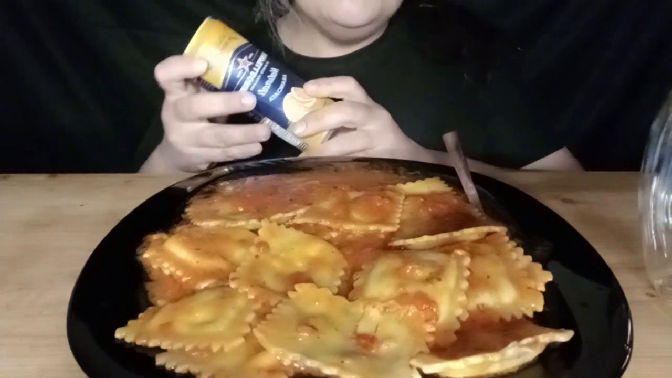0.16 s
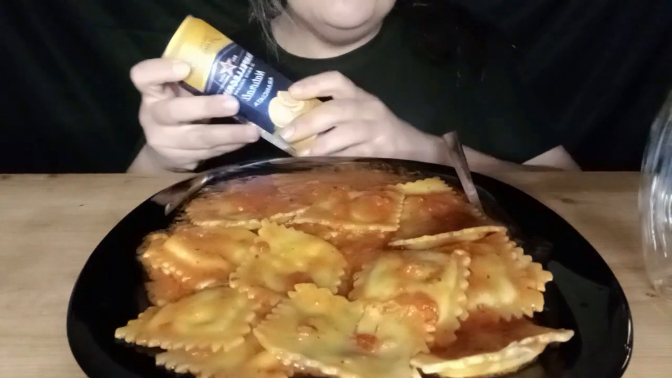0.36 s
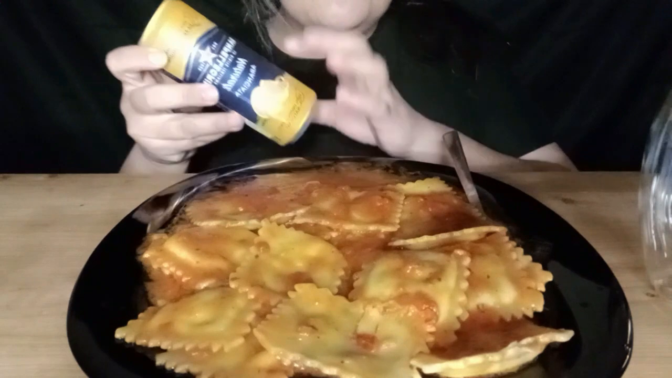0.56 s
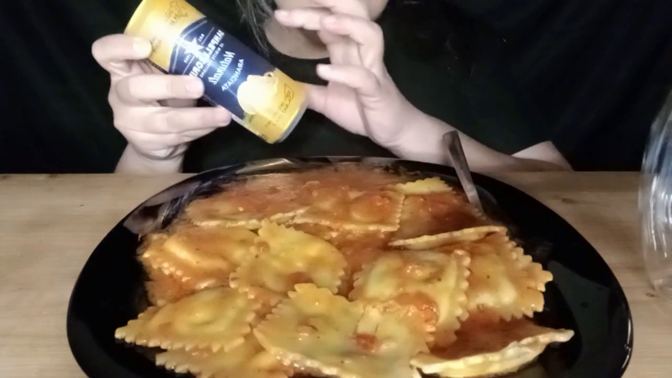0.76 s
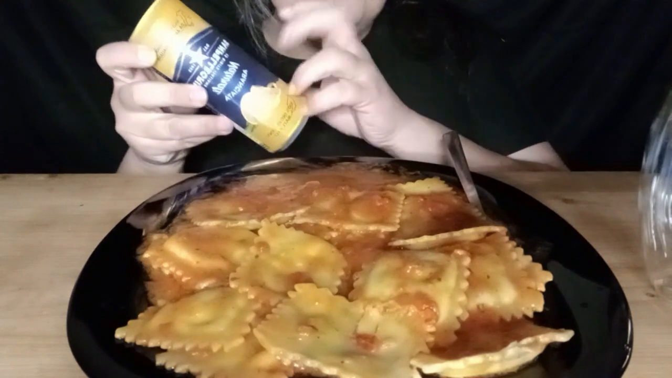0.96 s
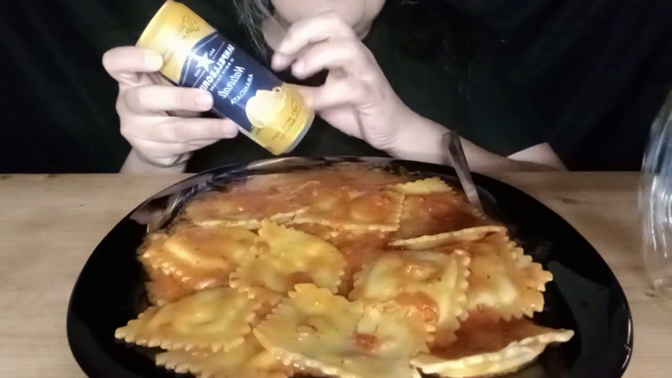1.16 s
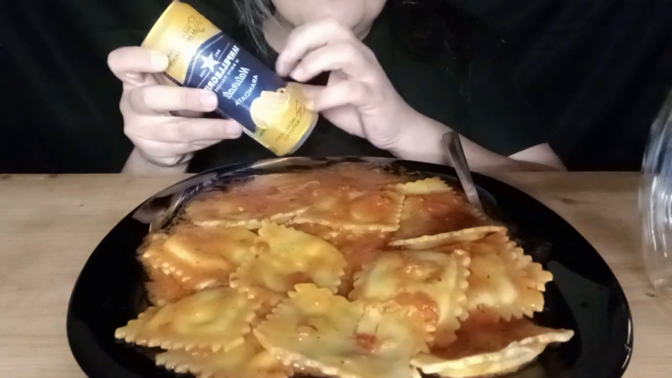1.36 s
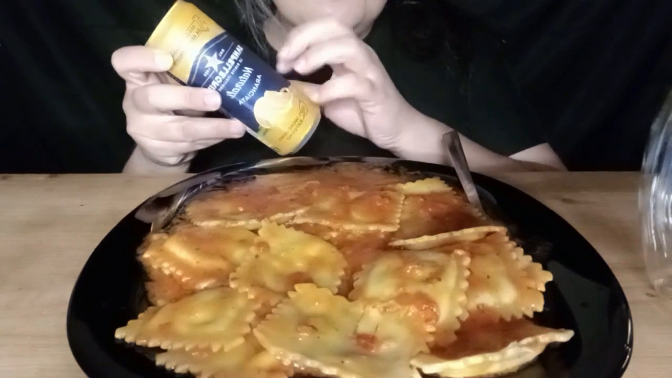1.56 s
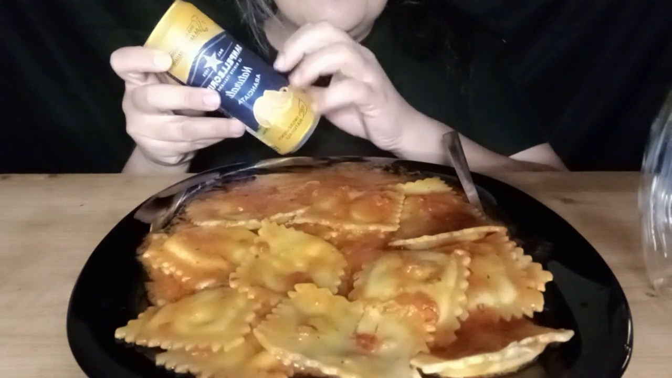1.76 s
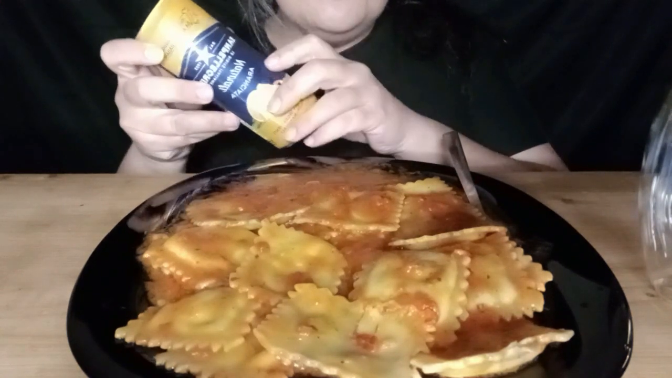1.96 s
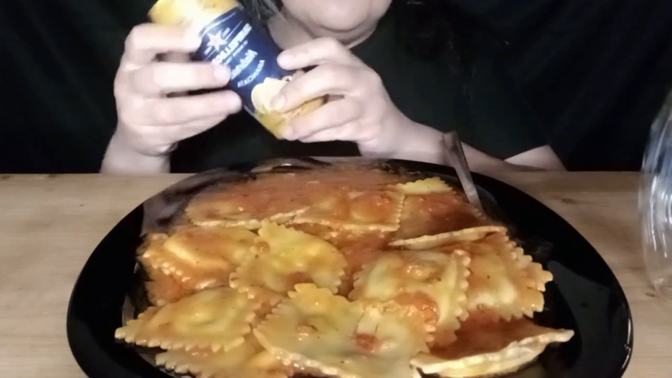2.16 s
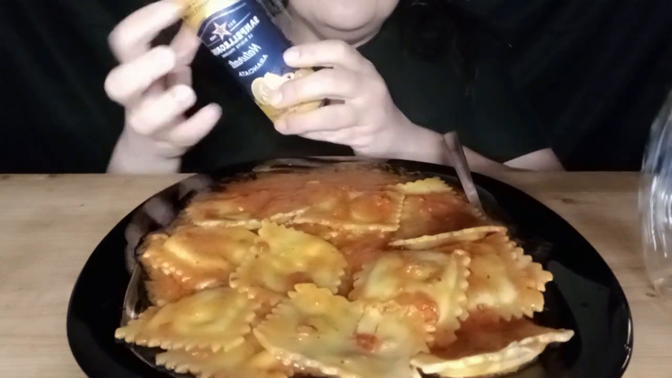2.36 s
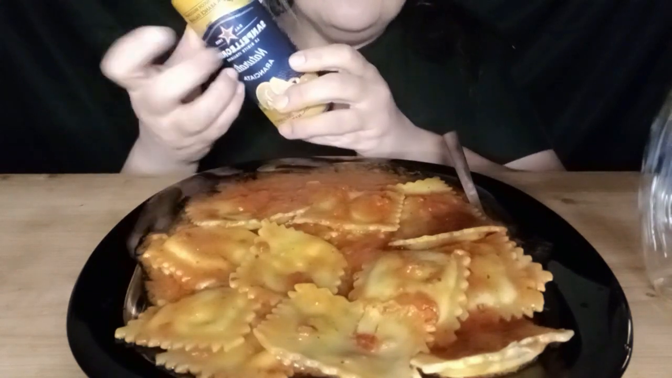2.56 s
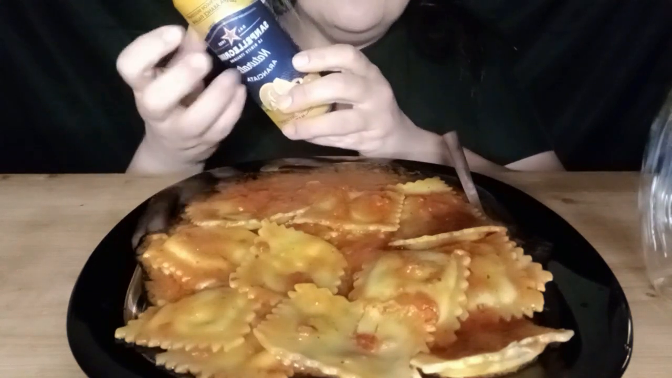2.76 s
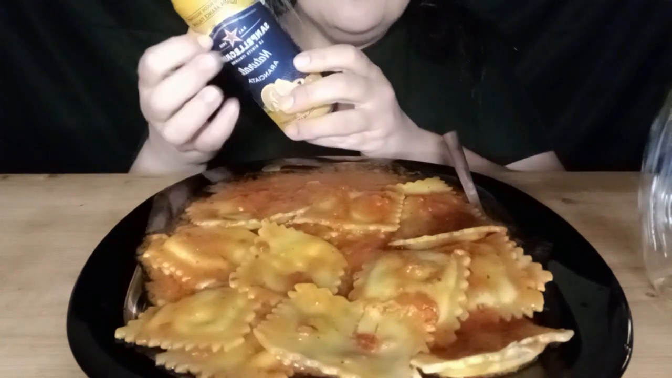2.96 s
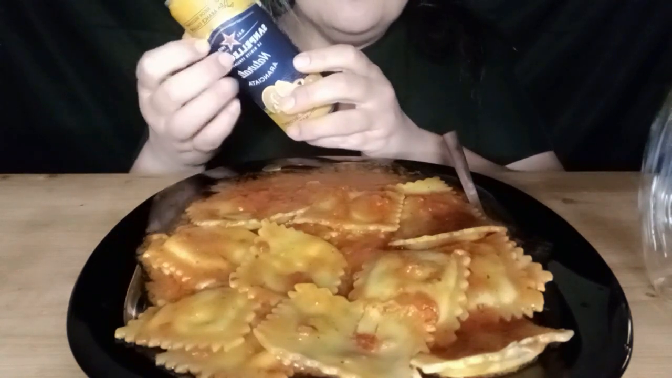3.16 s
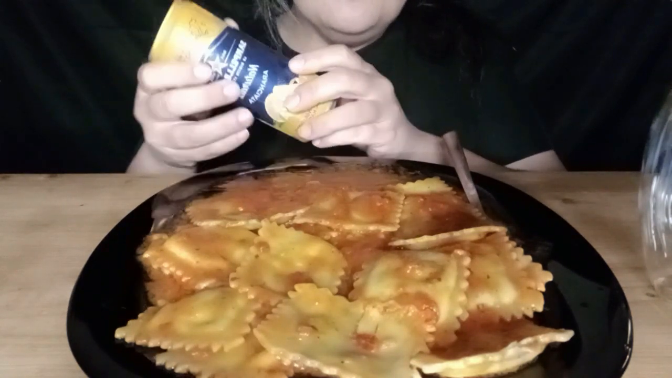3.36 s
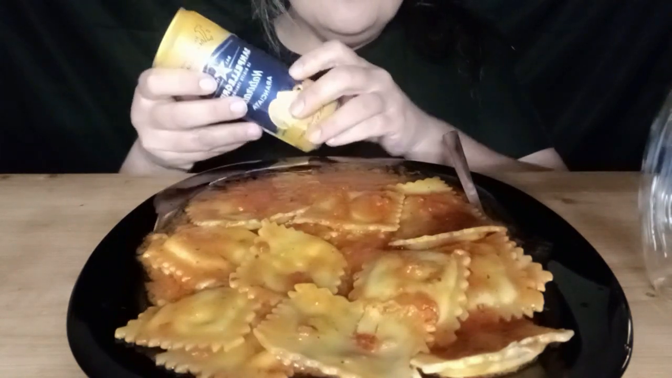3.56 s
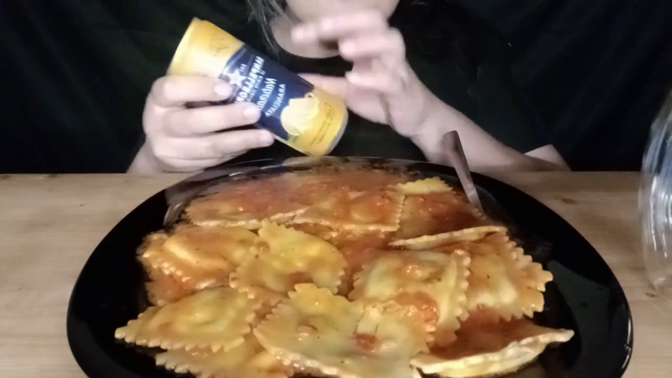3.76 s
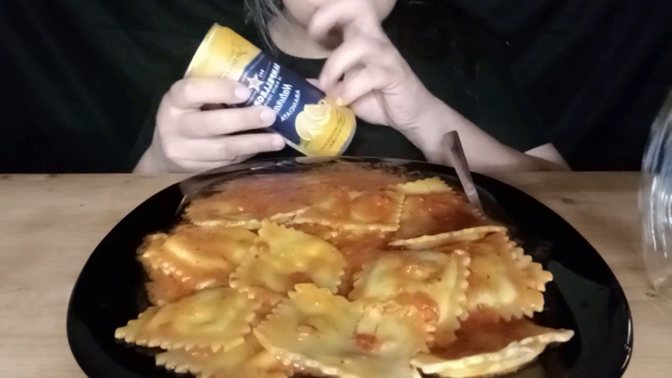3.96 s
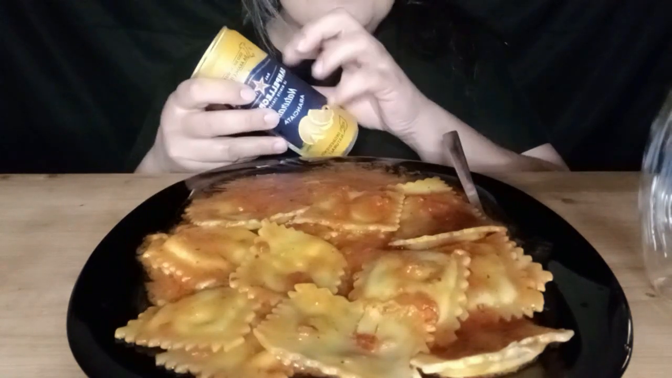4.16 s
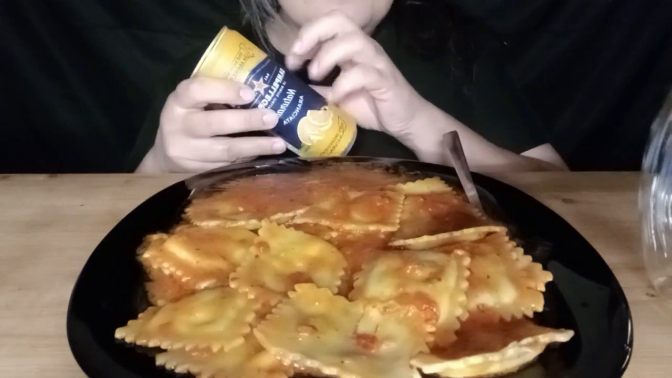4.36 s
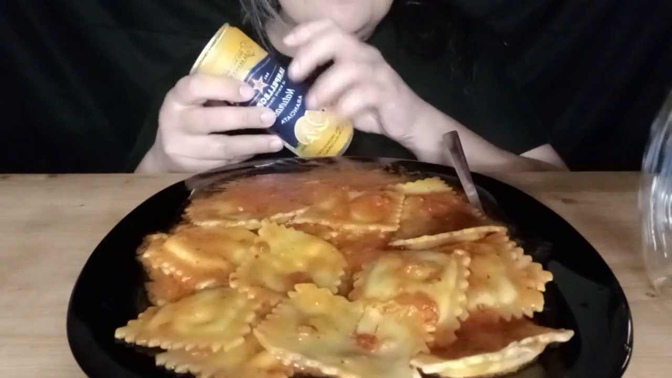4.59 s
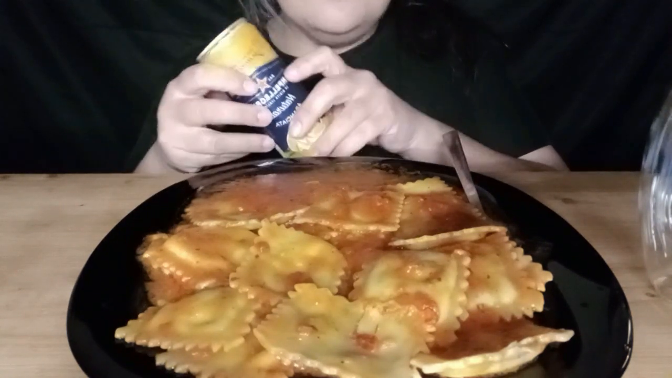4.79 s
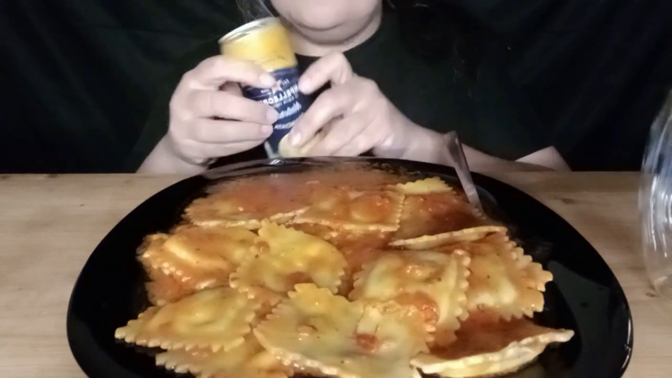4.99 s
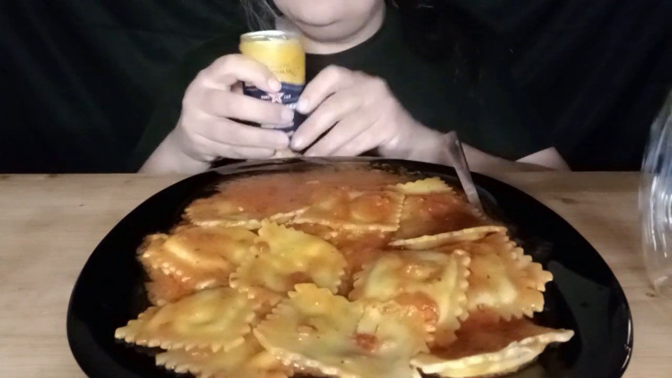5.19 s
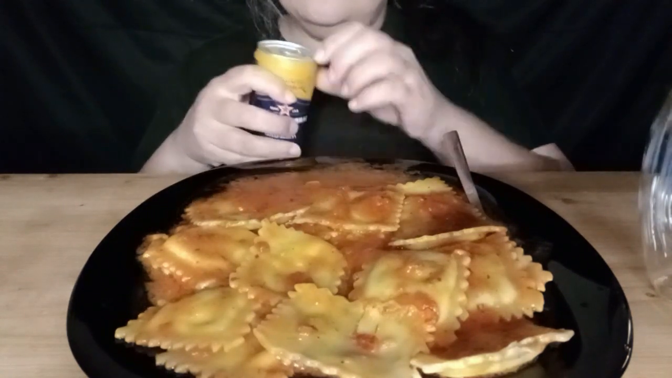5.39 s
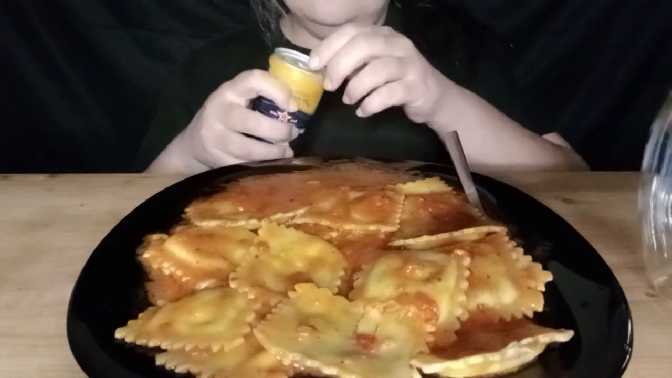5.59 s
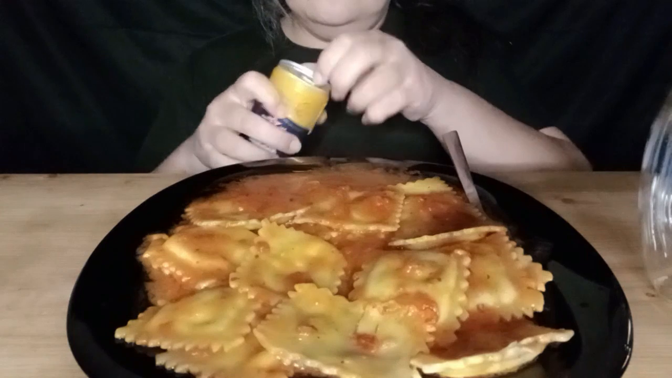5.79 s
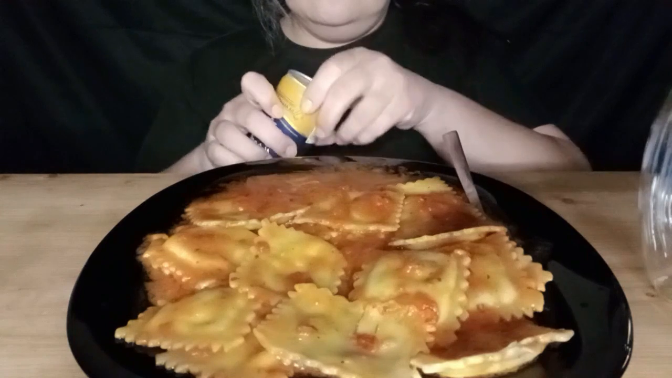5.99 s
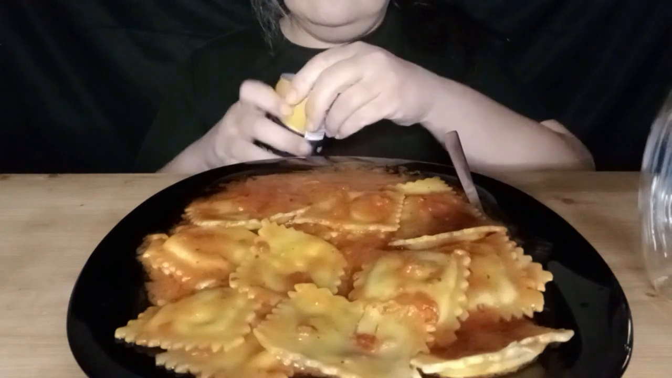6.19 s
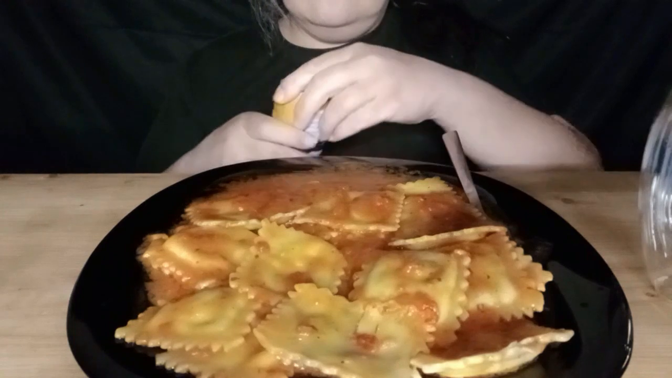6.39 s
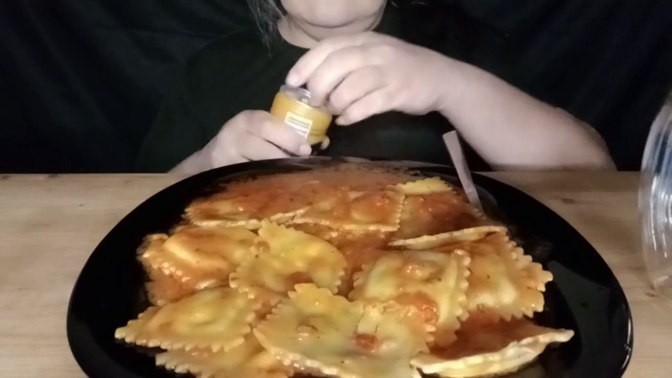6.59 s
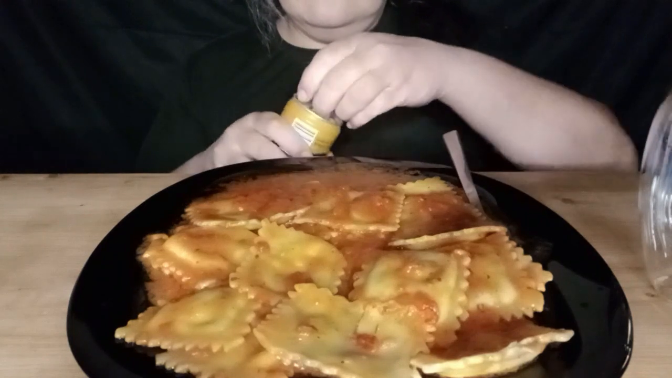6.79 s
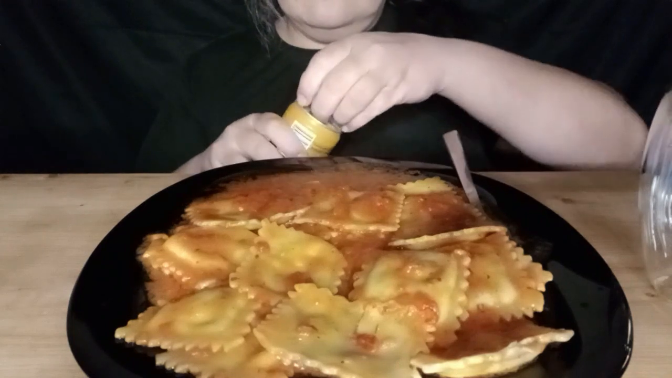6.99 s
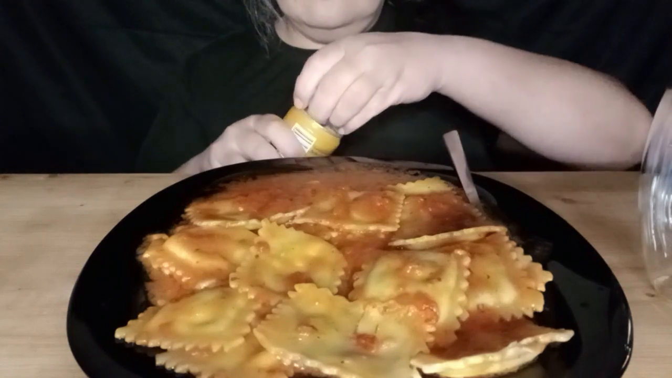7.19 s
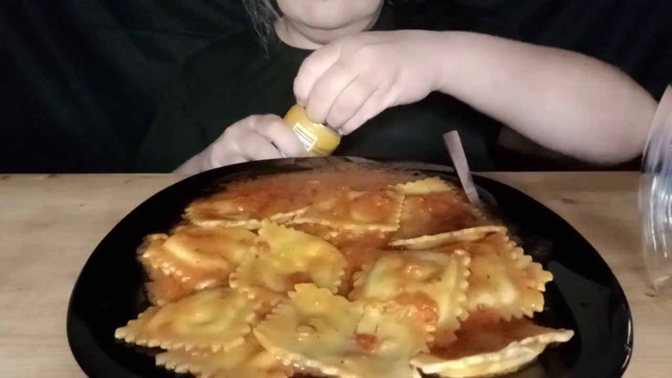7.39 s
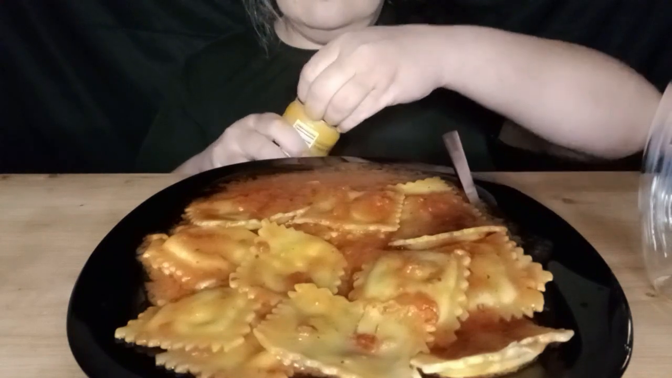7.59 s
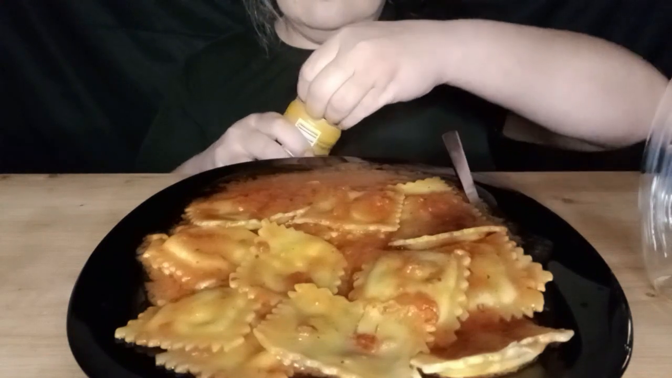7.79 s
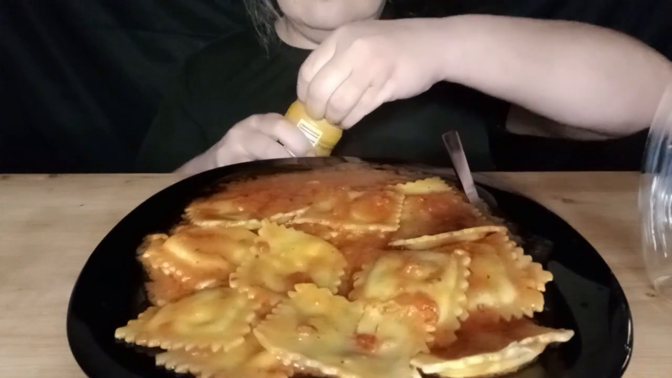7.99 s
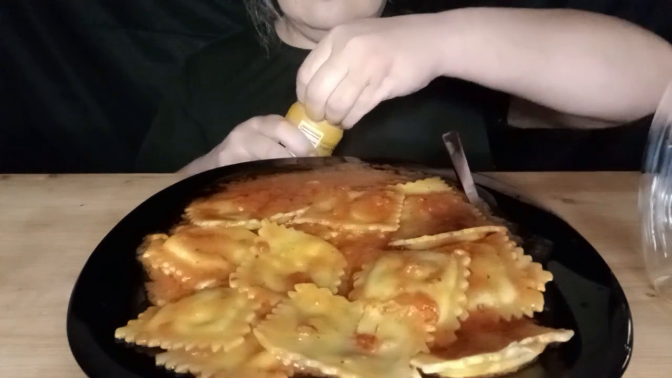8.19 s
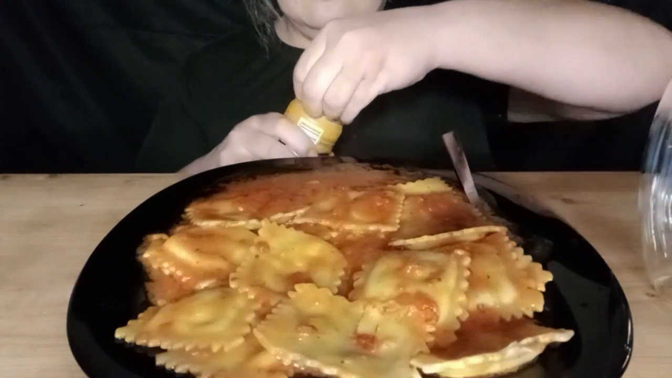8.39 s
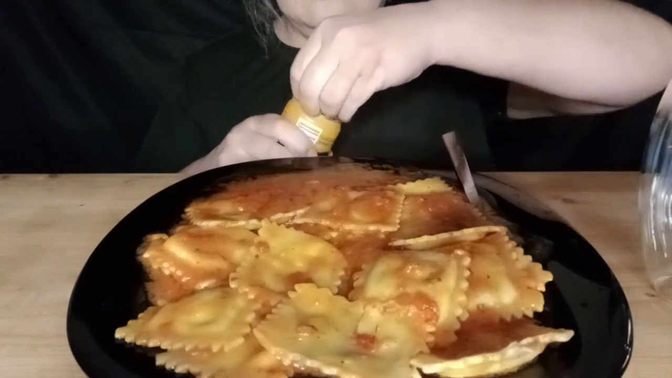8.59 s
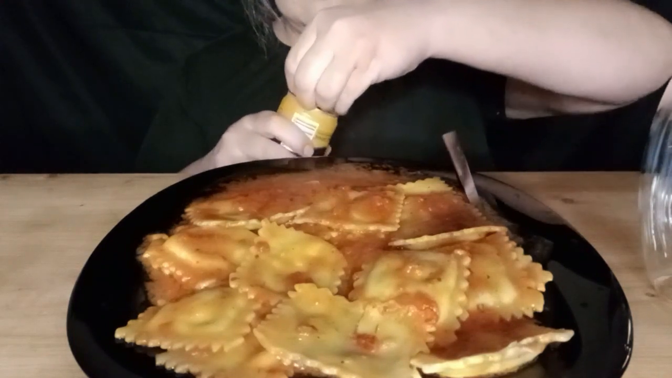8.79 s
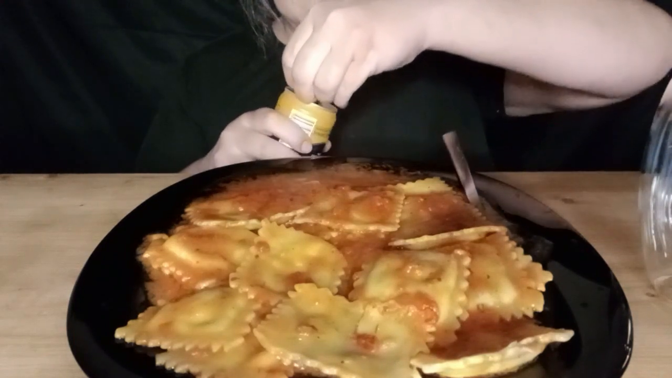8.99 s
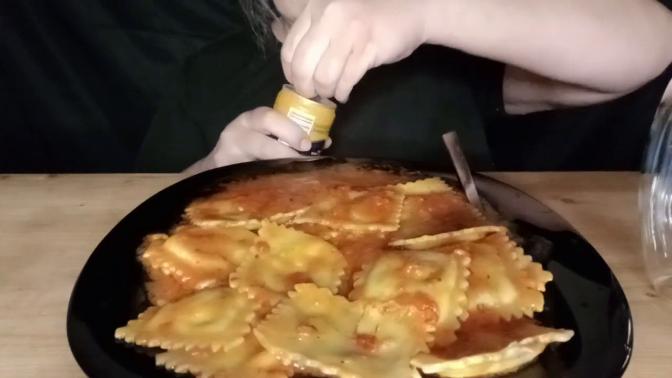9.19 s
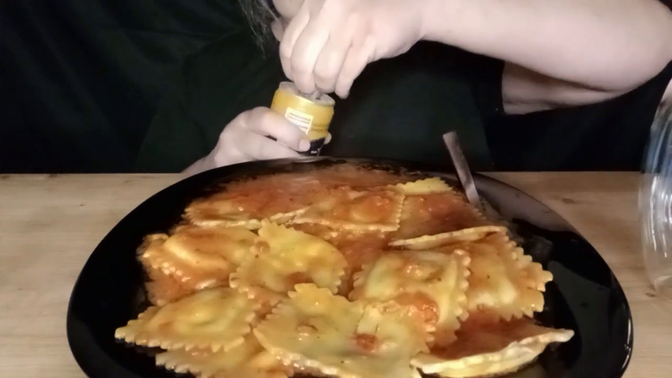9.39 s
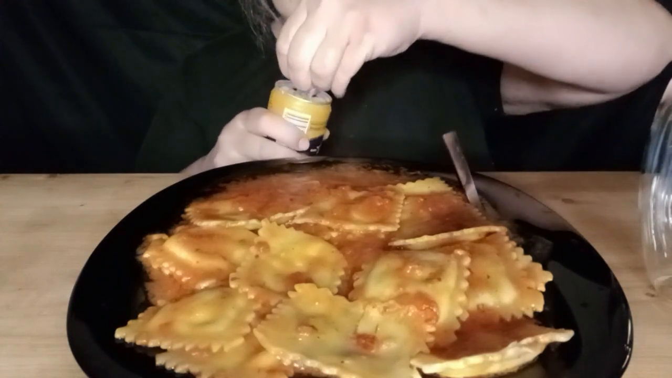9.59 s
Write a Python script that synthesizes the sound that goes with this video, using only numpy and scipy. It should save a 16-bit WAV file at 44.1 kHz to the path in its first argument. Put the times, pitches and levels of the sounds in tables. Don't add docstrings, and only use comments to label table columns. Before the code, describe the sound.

A quiet room with soft hiss, faint low hum and distant machinery rumble, miked very closely in stereo. A soft knock at 0.1 s. From 1.0 to 1.75 s fingernails drum on a full aluminium can: crisp, dense ticks with short dull-metal rings. A faint skin slip near 2.1. A second, slightly higher roll runs 2.6-3.2, then a short rub and soft knock around 3.4-3.5. A third roll runs 4.0-4.6. Small arm jolts at 5.6-5.7; knocks and skin slides at 6.1-6.6. Tiny nail picks at the tab, 6.8-7.9. At 8.24 the seal cracks sharply; gas leaks, swelling to a bright, shrill jet by 8.4, ended by a big pop at 8.52. Hollow froth murmurs on. A low thump and weak puffs at 8.8-9.2, double snap at 9.2, then two very loud snaps at 9.42-9.44 with a thud, decaying into fizzy quiet.

```python
import sys
import numpy as np
from scipy import signal
from scipy.fft import rfft, irfft
from scipy.io import wavfile
from scipy.ndimage import uniform_filter1d

SR = 44100
rng = np.random.default_rng(int(sys.argv[2]) if len(sys.argv) > 2 else 0)


def master(y):
    cut = np.clip(np.atleast_2d(y).T, -1, 1)
    pcm = np.round(cut * 32767)
    wavfile.write(sys.argv[1], SR, pcm.astype(np.int16))


def voltage_ratio(decibels):
    exponent = np.asarray(decibels, float) / 20
    return 10 ** exponent


N = 425565

# [f/Hz, level/dB]
HISS_SPECTRUM = [(74, -41.5), (125, -6), (235, -2), (367, -15.5), (497, -10), (634, -14), (1370, -17),
                 (1980, -18.5), (2570, -21), (7550, -27.5), (16000, -28.5)]
HISS_DB = -61.5
# [f/Hz, correlation/1]
HISS_LIKENESS = [(60, 0.12), (240, 0.15), (950, 0.3), (3770, 0.066), (15000, 0.046)]
# [f/Hz, level/dB, wavering/dB]
HUM = (100.3, -63, 0.72)
RUMBLE_DB = -62
RUMBLE_SWELLS = [
    (.12, -59.5, .15, 12),
    (4.2, -58, 0.53, 14),
    (7.5, -56, 0.91, 12),
]
DRONE_DB = -73
DRONE_SWELLS = [
    (.11, -62.5, 0.12, 23),
    (.95, -64.5, .5, 22),
    (1.95, -66.5, 1, 11),
    (2.35, -65, 0.19, 8.7),
    (4.3, -64, 0.27, 50),
]
# [t/s, length/s, f/Hz, level/dB]
MOAN = (1.99, .18, 500, -59)
# [f/Hz, t60/s]
ROOM_T60 = [(300, 1), (1000, 0.96), (2000, 0.86), (4000, .7), (8000, 0.48), (16000, 0.4)]
# [delay/s, left level/dB, right level/dB]
ECHO = (.0061, -4, -7)
ECHO_DULL = 0.08
# [f/Hz, level/dB]
HAND_SHIELD = [(500, 0), (2600, 2), (3300, -1), (3700, 3), (4200, -5.5), (5000, 2.5), (8000, 3),
               (11500, -0.5), (15000, 0)]

# [t/s, peak level/dB, f/Hz, t60/s]
THUDS = [
    (8.835, -35, 100.6, 0.52),
    (8.939, -40.5, 134.3, 0.22),
    (9.435, -49, 24, .2),
    (9.436, -31, 244, 0.12),
]
# [peak t/s, level/dB, rise/s, fade/(dB/s)]
JOLTS = [
    (5.3, -62.5, .2, 12),
    (5.594, -49, 0.049, 150),
    (5.724, -49, 0.031, 240),
    (8.68, -48, 0.055, 21),
    (8.842, -42.5, .012, 67),
    (8.955, -47, .03, 250),
    (9.012, -50, .015, 170),
    (9.45, -48, 0.011, 503),
    (9.494, -67, .02, 178),
]
# [f/Hz, level/dB]
JOLT_SPECTRUM = [(30, -60), (65, -11), (95, 0), (140, 3), (200, -4.5), (270, -10), (500, -27.5),
                 (1200, -120)]
# [peak t/s, level/dB, rise/s, fade/(dB/s)]
SLIDES = [
    (1.972, -72, .004, 393),
    (2.066, -70, .012, 248),
    (2.128, -64.5, .03, 160),
    (3.37, -64.5, .03, 424),
    (6.114, -54.5, 0.013, 82),
    (6.32, -62, .016, 800),
    (6.384, -58, .018, 90),
    (6.522, -56, 0.055, 130),
]
# [f/Hz, level/dB]
SKIN_SPECTRUM = [(1180, -4), (2000, -4), (2280, -3.5), (4570, -7), (7840, 2.5), (11200, -9), (15200, -8.5),
                 (16000, -10.5)]
# [t/s, f/Hz, width/Hz, level/dB, t60/s]
HOLLOW = [(8.525, 2070, 430, -29, 0.95), (8.525, 1470, 570, -35, 0.92), (8.522, 315, 185, -47, 1.97),
          (8.525, 4330, 450, -28.5, 0.7), (9.214, 4260, 900, -37, 0.37), (9.215, 6100, 1400, -35.5, 0.46),
          (9.445, 3700, 350, -27, 1.13), (9.44, 610, 250, -43.5, 0.63), (9.447, 1650, 960, -31.5, 0.56),
          (9.445, 280, 540, -39, 0.73), (8.24, 1900, 130, -48, 0.36), (8.24, 2760, 500, -49, 0.24),
          (9.212, 1940, 890, -43.5, 0.32), (9.212, 540, 230, -52, 0.38), (8.98, 834, 71, -56.5, 0.65),
          (8.525, 3500, 1300, -33, 0.79), (9.9, 1800, 140, -52, 1.1), (9.446, 4400, 2000, -28.5, 0.84),
          (10, 13000, 2200, -31.5, 0.46), (9.215, 4130, 450, -44, 0.34), (9.446, 12000, 5400, -39, 0.67),
          (8.238, 1180, 58, -39, 0.1), (8.525, 6100, 1900, -37.5, 0.95)]
SAG_PER_S, FLUTTER_DB = 0.032, 1.5

# [t/s, peak level/dB, f/Hz, t60/s, bright body level/dB]
KNOCKS = [
    (0.1193, -54, 1070, 0.068, -13.5),
    (3.5282, -51, 1410, 0.053, -1),
    (6.113, -63, 1010, .06, -13),
    (6.1903, -49.5, 1190, 0.18, 0.5),
    (6.3175, -53.5, 1233, 0.1, -8),
    (6.558, -63, 1160, .08, -14),
]
# [f/Hz, level/dB, t60/s]
DOME_MODES = [(2360, -10, 0.17), (2580, -10, .1), (2920, -9, .1), (3233, -6.5, 0.12), (4150, -10, .06)]
# [t/s, damped t/s, level/dB, from f/Hz, to f/Hz]
RINGS = [(1.02, 1.218, -55, 1410, 1400), (1.21, 1.256, -65, 2450, 2450), (1.3, 1.35, -55, 1404, 1400),
         (1.352, 1.415, -57, 1410, 1400), (1.548, 1.608, -52, 1414, 1404), (1.61, 1.7, -62, 1400, 1400),
         (1.7, 1.785, -54.5, 1400, 1400), (1.702, 1.765, -50, 1107, 1043), (1.79, 1.855, -66, 1400, 1400),
         (2.594, 2.65, -55, 1730, 1620), (2.6, 2.78, -68, 1160, 1160), (2.654, 2.785, -52.5, 1574, 1495),
         (2.853, 2.905, -57, 1700, 1530), (2.897, 2.98, -62, 1490, 1490), (2.87, 2.957, -62, 1170, 1144),
         (2.985, 3.02, -58, 1520, 1580), (2.985, 3.106, -61.5, 1140, 1140), (3.101, 3.152, -55, 1572, 1490),
         (3.101, 3.3, -54, 1136, 1145), (3.143, 3.29, -57, 1430, 1590), (3.3, 3.37, -66, 1590, 1530),
         (3.53, 3.665, -54, 1427, 1370), (3.98, 4.045, -61, 1400, 1400), (4.098, 4.152, -54, 1410, 1417),
         (4.157, 4.225, -70, 1400, 1400), (4.246, 4.325, -59, 1400, 1400), (4.35, 4.43, -61.5, 1400, 1400),
         (4.53, 4.62, -62, 1405, 1420)]
# [t/s, peak level/dB, f/Hz]
PICKS = [(5.7224, -65.5, 6600), (6.7856, -55, 6000), (6.8275, -56, 6000), (7.0064, -66, 6370),
         (7.0848, -61, 6300), (7.1094, -67, 6460), (7.2475, -52.5, 5800), (7.3014, -64, 5830),
         (7.4524, -71, 6480), (7.6144, -65.5, 5150), (7.7694, -67, 7580), (7.881, -59, 7400),
         (7.9014, -63, 6430)]
# [f/Hz, level/dB]
NAIL_SPECTRUM = [(180, -42), (300, 0), (385, -1.5), (749, -13), (1040, -2.5), (1690, -28), (1870, -2.5),
                 (2140, -17), (3240, -11), (8220, -3), (16000, -14)]
# [f/Hz, level/dB, t60/s]
WALL_MODES = [(393.4, -3.5, 0.43), (1086, 6.5, 0.078), (1400, -8, 0.1), (1870, 3.5, 0.1),
              (2057, -5.5, 0.18), (2600, -15, 0.086), (3330, 5, 0.045), (3760, 7, 0.035), (4380, -6, .035),
              (4850, -3, 0.042), (5400, -4, 0.13), (7900, -24, .06)]
# [f/Hz, level/dB, t60/s]
SHOULDER_MODES = [(359, -4.5, 0.17), (1160, -8, 0.096), (1553, -2.5, 0.081), (1932, -7, 0.091),
                  (2385, -2.5, 0.11), (2820, -3, 0.056), (3310, -1, .04), (3900, 6, 0.05),
                  (4270, -2, 0.043), (5760, -7, 0.14), (8060, 6, 0.072)]
# [start t/s, end t/s]
SHOULDER_SPAN = (2.5, 3.4)
# [t/s, peak level/dB, low-mode level/dB, favoured f/Hz]
ROLL_1 = [(1.019, -30, -19, 1440), (1.1024, -41, -19, 1860), (1.136, -28.5, -21, 1078),
          (1.1412, -37, -11, 1870), (1.272, -33.5, -24, 1860), (1.3, -31.5, -21, 1420),
          (1.331, -33.5, -25, 1160), (1.3503, -30, -18, 1420), (1.4703, -32.5, -24.5, 1900),
          (1.517, -45, -22, 1140), (1.5478, -30, -20.5, 1420), (1.688, -29.5, -26, 1870),
          (1.6995, -33.5, -18, 1180), (1.717, -29.5, -19.5, 980), (1.7392, -32, -24, 1050)]
# [t/s, peak level/dB, low-mode level/dB, favoured f/Hz]
ROLL_2 = [(2.584, -40.5, -22, 1710), (2.5938, -34, -15, 1670), (2.6545, -29, -14.5, 1540),
          (2.7103, -38.5, -15, 1500), (2.8528, -31.5, -16, 1680), (2.8954, -32.5, -15, 1167),
          (2.9848, -35, -12.5, 1570), (3.1008, -33.5, -15.5, 1500), (3.1417, -30.5, -14, 1172),
          (3.2242, -41, -17.5, 1560)]
# [t/s, peak level/dB, low-mode level/dB, favoured f/Hz]
ROLL_3 = [(3.9788, -33.5, -22, 1170), (4.0458, -34.5, -17, 1846), (4.096, -33.5, -18, 1400),
          (4.155, -34, -14.5, 1400), (4.2443, -32, -22, 1400), (4.3246, -38, -13, 1025),
          (4.3348, -29, -20, 1830), (4.449, -31.5, -25.5, 1110), (4.4659, -33.5, -21.5, 1108),
          (4.5094, -33.5, -19, 1030), (4.5284, -34, -19.5, 1100), (4.6324, -32.5, -24.5, 1080)]
# [treble level/dB, left-right level/dB]
GRIPS = [
    (-13.5, 1.7),
    (-11.5, 2),
    (-12, 1.5),
]
# [t/s, peak level/dB, low-mode level/dB, favoured f/Hz, treble level/dB]
STRAYS = [
    (0.968, -56, -20, 1800, -29),
    (3.5301, -51.5, -5, 1055, -41),
    (3.6836, -57, -15, 1560, -18),
    (4.724, -52, -34, 1160, -50),
    (5.451, -46, -37, 1680, -11),
]
STRAY_PAN_DB = 4

# [peak t/s, level/dB, rise/s, fade/(dB/s)]
PUFFS = [
    (8.846, -37, 0.016, 123),
    (8.994, -40, 0.017, 140),
    (9.144, -44.5, 0.043, 69),
    (9.19, -55, .03, 900),
]
# [f/Hz, level/dB]
PUFF_SPECTRUM = [(290, -24), (500, -2), (631, -19.5), (855, -6.5), (1090, -10), (1360, -8), (2650, -4.5),
                 (2850, -3), (7980, 2), (13300, -7), (16000, -8.5)]
# [t/s, level/dB]
GAS_FLOW = [
    (8.24, -39.5),
    (8.3, -39),
    (8.366, -35.5),
    (8.414, -26),
    (8.512, -27.5),
    (8.53, -26),
    (8.56, -58),
    (8.66, -59),
    (8.686, -43.5),
    (8.83, -64),
]
# [f/Hz, level/dB]
JET_SPECTRUM = [(290, -53), (500, -26.5), (1480, -22), (2100, -19), (2900, -12), (3400, -13.5),
                (3900, -4.5), (5470, -4), (7400, -0.5), (8210, 5.5), (8900, -1.5), (9920, -4), (12900, -3),
                (15600, -2.5), (16150, -16)]
SHRILL_DB, SHRILL_S, VENT_AT_S, VENTED_DB = 8, 0.06, 8.536, -2
SNAP_TIMES = [
    8.2369,
    8.5181,
    9.2047,
    9.209,
    9.4243,
    9.4360,
]
# [peak level/dB, low pop level/dB, tear length/s]
SNAPS = [
    (-14.5, -17.5, 0.0023),
    (-6, 3.5, 0.0036),
    (-16, -28, 0.0029),
    (-8, -22, 0.0015),
    (-5, -14, 0.0014),
    (2.5, -12, 0.0034),
]
# [f/Hz, width/Hz, level/dB]
LID_MODES = [
    [(4840, 760, -5), (6140, 750, -4.5), (7250, 570, -0.5), (9200, 900, -7), (11500, 1500, -6.5),
     (14900, 1400, -11.5)],
    [(4300, 900, 2), (2840, 420, -7), (5610, 780, -7), (7950, 670, -7.5), (10000, 900, -19),
     (13600, 1200, -14)],
    [(4420, 310, 1), (5660, 630, -8.5), (7400, 770, -7), (10200, 1500, -9), (13000, 1500, -13),
     (15200, 800, -15)],
    [(4280, 390, 1.5), (4900, 410, -8), (6140, 460, -6), (7320, 460, -5.5), (8100, 230, -10),
     (11700, 680, -12), (13600, 780, -9)],
    [(4120, 510, 1.5), (3530, 300, -18), (5600, 720, -2.5), (7800, 600, -9), (11500, 3000, -18)],
    [(4090, 580, 1.5), (3670, 380, -8), (4910, 570, -7), (6240, 610, -9), (10020, 1150, -10.5),
     (11330, 1300, -9), (14300, 1600, -10)],
]
# [f/Hz, width/Hz, level/dB]
POP_MODES = [(1180, 280, -9.5), (1450, 190, -11), (2100, 540, -9)]
TEAR_RISE_S = 0.0002


def evened(x):
    return x / np.sqrt(np.mean(x ** 2) + 1e-20)


def read(points, hz):
    f, value = np.transpose(points)
    return np.interp(np.log(hz + 1), np.log(f + 1), value)


def follow(rows):
    s, db = np.transpose(rows)
    return np.interp(np.arange(N) / SR, s, db, left=-120, right=-120)


def add(mix, s, sound, pan_db):
    part = mix[:, round(s * SR):][:, :sound.shape[-1]]
    part += sound[..., :part.shape[1]] * voltage_ratio([[pan_db / 2], [-pan_db / 2]])


def strokes(rows):
    t, power = np.arange(N) / SR, 0
    for s, db, rise, fade_db in rows:
        swell = np.clip(1 + (t - s) / rise, 0, 1) ** 2
        fade = voltage_ratio(db - abs(fade_db) * np.maximum(t - s, 0))
        power = power + (swell * fade) ** 2
    return np.sqrt(power)


def noise(spectrum, same, patchy_db, size=1024):
    frames, hz = 4 * N // size + 5, np.fft.rfftfreq(size, 1 / SR)
    a, b, c, d, patches = rng.standard_normal((frames, len(hz), 5)).T
    patches = uniform_filter1d(patches, size=8, axis=0)
    patches = evened(uniform_filter1d(patches, size=10, axis=1))
    same = np.clip(same * np.ones(len(hz)), -1, 1)[:, None]
    left = a + 1j * b
    right = same * left + np.sqrt(1 - same ** 2) * (c + 1j * d)
    z = np.array([left, right]) * voltage_ratio(read(spectrum, hz)[:, None] + patchy_db * patches)
    return evened(signal.istft(z, nperseg=size, noverlap=size * 3 // 4)[1][:, :N])


def burst(t, same):
    a, b = rng.standard_normal((2, len(t)))
    same = np.clip(same, 0, 1)
    return np.array([a, same * a + np.sqrt(1 - same ** 2) * b])


def resonate(x, modes):
    out = 0
    for hz, width, db in modes:
        r = np.exp(-np.pi * width / SR)
        rung = signal.lfilter([1, 0, -1], [1, -2 * r * np.cos(2 * np.pi * hz / SR), r * r], x)
        out = out + voltage_ratio(db) * evened(rung) * np.std(x)
    return out


def ring(modes, t, spread_db, near_hz=None):
    hz, db, t60 = np.transpose(modes)[:, :, None]
    luck = rng.standard_normal((len(modes), 3, 1))
    if near_hz:
        near = np.exp(-(np.log(hz / near_hz) / 0.061) ** 2)
        db = db + 5.0 * near
        hz = hz * (near_hz / hz) ** near
    hz = hz * (1 + hz / 4e5 * luck[:, 1])
    dying_db = -60 * t / (t60 * np.exp(0.17 * luck[:, 2]))
    level = voltage_ratio(db + spread_db * luck[:, 0] + dying_db)
    return (level * np.sin(2 * np.pi * hz * t)).sum(0)


def room(x, tail_db, colour):
    arrivals = np.zeros((2, SR))
    at = np.arange(300, SR - 20, 20) + rng.integers(0, 20, (2, (SR - 301) // 20))
    np.put_along_axis(arrivals, at, rng.choice([-1., 1.], at.shape), 1)
    hz, t, z = signal.stft(arrivals, SR, nperseg=256)
    decay_db = read(colour, hz)[:, None] - 60 * t / read(ROOM_T60, hz)[:, None]
    tail = signal.istft(z * voltage_ratio(decay_db), SR, nperseg=256)[1]
    tail *= np.minimum(np.arange(tail.shape[1]) / (0.015 * SR), 1)
    tail *= voltage_ratio(tail_db) / np.linalg.norm(tail[0])
    tail[:, 0] += 1
    at = round(ECHO[0] * SR)
    tail[:, at - 1:at + 2] += np.outer(voltage_ratio(ECHO[1:]), [ECHO_DULL, 1 - 2 * ECHO_DULL, ECHO_DULL])
    return signal.fftconvolve(x, tail, axes=1)[:, :N]


def room_tone():
    t = np.arange(N) / SR
    likeness = read(HISS_LIKENESS, np.fft.rfftfreq(2048, 1 / SR))
    hiss = voltage_ratio(HISS_DB) * noise(HISS_SPECTRUM, likeness, patchy_db=0.4, size=2048)
    low = noise([(10, -32), (25, -3), (40, -11.5), (55, -7.5), (75, -9.0), (110, -84)],
                same=0.15, patchy_db=3.0, size=8192)
    drone = noise([(200, -93), (300, -31.0), (345, 0), (385, 0.5), (440, -21), (600, -82)],
                  same=0.6, patchy_db=4.5, size=2048)
    slow = np.geomspace(0.3, 6, num=12)
    waver = evened(sum(np.sin(2 * np.pi * (f * t + rng.random())) for f in slow))
    hum_hz, hum_db, waver_db = HUM
    hum = np.sqrt(2) * voltage_ratio(hum_db + waver_db * waver) * np.sin(2 * np.pi * hum_hz * t + 0.3 * waver)
    bed = hiss + np.hypot(voltage_ratio(RUMBLE_DB), strokes(RUMBLE_SWELLS)) * low * voltage_ratio([[0.8], [-0.8]])
    bed += np.hypot(voltage_ratio(DRONE_DB), strokes(DRONE_SWELLS)) * drone
    return bed * voltage_ratio([[1.4], [-1.4]]) + hum


def moan():
    start, length, hz, db = MOAN
    out, t = np.zeros((2, N)), np.arange(0, length, 1 / SR)
    add(out, start, voltage_ratio(db) * np.sin(2 * np.pi * hz * t) * np.hanning(len(t)), pan_db=1.0)
    return out


def thuds():
    out, t = np.zeros((2, N)), np.arange(SR // 2) / SR
    for s, db, hz, t60 in THUDS:
        boom = np.sin(2 * np.pi * hz * t) + 0.5 * np.sin(2 * np.pi * 1.8 * hz * t)
        add(out, s, voltage_ratio(db - 60 * t / t60) * boom * np.minimum(t / 0.008, 1), pan_db=2.4)
    return out


def hands():
    skin = voltage_ratio(2.0) * strokes(SLIDES) * noise(SKIN_SPECTRUM, same=0.17, patchy_db=1.5, size=256)
    arm = voltage_ratio(1.2) * strokes(JOLTS) * noise(JOLT_SPECTRUM, same=0.75, patchy_db=1.5, size=1024)
    return skin + arm * voltage_ratio([[2.5], [-2.5]])


def hollow():
    out, t = np.zeros((2, N)), np.arange(SR) / SR
    for s, hz, width, db, t60 in HOLLOW:
        froth = burst(t, same=0.41)
        tone = resonate(resonate(froth, [(hz, width, 0)]), [(hz, 1.5 * width, db)])
        tone = np.array([np.interp(t - SAG_PER_S * t ** 2, t, side) for side in tone])
        flutter_db = FLUTTER_DB * evened(uniform_filter1d(rng.standard_normal(SR), size=300))
        add(out, s, tone * voltage_ratio(flutter_db - 60 * t / t60), pan_db=-0.5)
    return out


def knocks():
    out, t = np.zeros((2, N)), np.arange(16384) / SR
    body_modes = [(2380, 230, -4.5), (2780, 220, -2.0), (3090, 200, -2.5), (4100, 500, -10)]
    for s, db, hz, t60, body_db in KNOCKS:
        dome = ring([(hz, 0, t60), (0.8 * hz, -8, 0.05)], t, spread_db=0)
        dome += voltage_ratio(body_db) * ring(DOME_MODES, t, spread_db=4.5)
        grit = burst(t, same=0.51) * voltage_ratio(body_db - 5 - 60 * t / 0.11)
        body = resonate(resonate(grit, [(2880, 1500, 0)]), body_modes)
        add(out, s, voltage_ratio(db + 0.5) * (dome + body) * np.minimum(t / 0.00098, 1), pan_db=0.0)
    return out


def rings():
    out, t = np.zeros((2, N)), np.arange(16384) / SR
    for s, end, db, from_hz, to_hz in RINGS:
        hz = np.interp(t, [0, end - s], [from_hz, to_hz])
        dying_db = -60 * t / 0.46 - 60 * np.maximum(t - end + s, 0) / 0.05
        tone = np.sin(2 * np.pi * (np.cumsum(hz) / SR + rng.random())) * np.minimum(t / 0.0058, 1)
        add(out, s, voltage_ratio(db + dying_db) * tone, pan_db=1.0)
    return out


def picks():
    out, t = np.zeros((2, N)), np.arange(2048) / SR
    for s, db, hz in PICKS:
        grit = burst(t, same=0.87) * voltage_ratio(-60 * t / 0.033)
        tab = [(hz, 350, 0), (1.18 * hz, 1200, -2), (2.1 * hz, 1500, -11), (0.53 * hz, 900, -12)]
        add(out, s, voltage_ratio(db - 1.5) * resonate(grit, tab), pan_db=0.5)
    return out


def taps():
    out, t = np.zeros((2, N)), np.arange(16384) / SR
    hz = np.fft.rfftfreq(len(t), 1 / SR)
    touches = [(*tap, *grip) for roll, grip in zip((ROLL_1, ROLL_2, ROLL_3), GRIPS) for tap in roll]
    touches += [(*tap, STRAY_PAN_DB) for tap in STRAYS]
    for s, db, low_db, near_hz, top_db, pan_db in sorted(touches):
        tilt = [(1500, low_db + 11.5), (3000, 0), (10000, 0), (12000, top_db + 12.5)]
        colour = voltage_ratio(read(NAIL_SPECTRUM, hz) + read(tilt, hz))
        dense = evened(irfft(rfft(burst(t, same=0.55)) * colour))
        dense *= voltage_ratio(-60 * t / 0.012) + voltage_ratio(-8.5 - 60 * t / 0.059)
        slosh = resonate(burst(t, same=0.73), [(2740, 2100, 0.0052)])
        dense += voltage_ratio(-19.5 - 60 * t / 0.17) * slosh
        place = SHOULDER_MODES if SHOULDER_SPAN[0] < s < SHOULDER_SPAN[1] else WALL_MODES
        wall = voltage_ratio(low_db - 6) * ring(place, t, spread_db=1.6, near_hz=near_hz)
        add(out, s, voltage_ratio(db - 0.5) * (dense * np.minimum(t / 0.0012, 1) + wall), pan_db)
    return out


def puffs():
    return voltage_ratio(1.25) * strokes(PUFFS) * noise(PUFF_SPECTRUM, same=0.19, patchy_db=2.5, size=256)


def gas():
    t = np.arange(N) / SR
    jet = noise(JET_SPECTRUM, same=0.35, patchy_db=1.6, size=256)
    body = signal.sosfiltfilt(signal.butter(4, 10800, fs=SR, output="sos"), jet)
    treble = jet - body
    splutter_db = 1.16 * evened(uniform_filter1d(rng.standard_normal(N), size=60))
    loud = slice(round(8.4 * SR), round(8.5 * SR))
    unit = np.std(body[:, loud])
    widening = voltage_ratio(SHRILL_DB) * np.clip((t - GAS_FLOW[0][0]) / SHRILL_S, 0, 1)
    shrill = np.where(t < VENT_AT_S, widening, voltage_ratio(VENTED_DB))
    top = treble / np.std(treble) * shrill * voltage_ratio(-2.5)
    flow = voltage_ratio(follow(GAS_FLOW) + splutter_db + 0.8)
    return flow * (body / unit * voltage_ratio(2.5) + top) * voltage_ratio([[0.8], [-0.8]])


def snaps():
    out, t = np.zeros((2, N)), np.arange(4096) / SR
    for s, (db, pop_db, length), modes in zip(SNAP_TIMES, SNAPS, LID_MODES):
        tearing = voltage_ratio(-11 * t / length - 60 * np.maximum(t - length, 0) / 0.002)
        tear = burst(t, same=0.42) * tearing * np.minimum(t / TEAR_RISE_S, 1)
        tear[:, 4] += 5.0
        lid = 0
        for hz, width, mode_db in modes:
            driven = resonate(tear, [(hz, 2.03 * width, 0)])
            lid = lid + resonate(driven, [(hz, width, mode_db)])
        gulp = 0.52 * tear[0] + 2.54 * (t < 0.0003)
        pop = resonate(resonate(gulp, [(1670, 1740, 0)]), POP_MODES)
        add(out, s, voltage_ratio(db) * (lid + voltage_ratio(pop_db) * pop), pan_db=0.5)
    return out


def scene():
    background = room_tone() + moan() + thuds() + hands() + hollow()
    fingertips = knocks() + rings()
    can = room(picks() + taps() + puffs() + gas(), tail_db=-11, colour=[(500, 0), (16000, 0)])
    lid = room(snaps(), tail_db=-13.5, colour=HAND_SHIELD)
    return background + fingertips + can + lid


def band_limit(x):
    return signal.sosfilt(signal.butter(12, 16190, fs=SR, output="sos"), x)


def record(dry):
    clipped = np.clip(dry, -0.97, 0.97)
    low_pass = signal.firwin(511, 16200, window=("kaiser", 9), fs=SR)
    mix = signal.oaconvolve(clipped, low_pass[None], "same")
    return band_limit(mix)


dry = scene()
out = record(dry)
master(out)
```